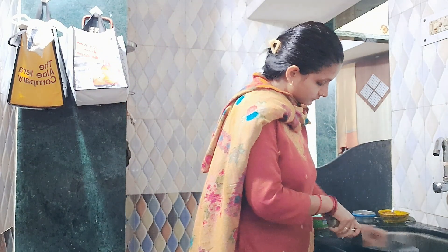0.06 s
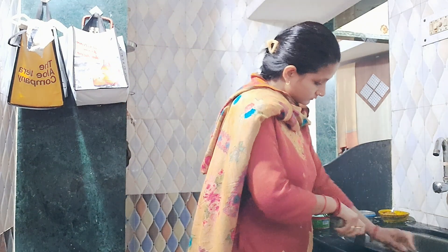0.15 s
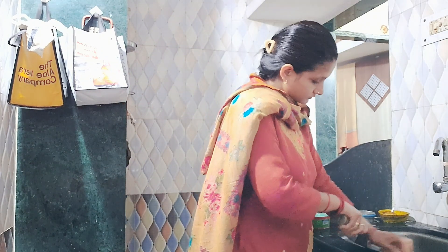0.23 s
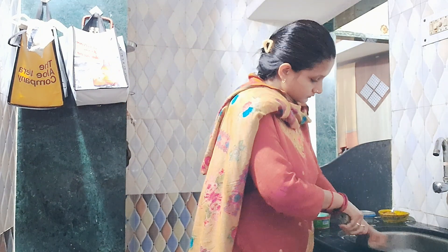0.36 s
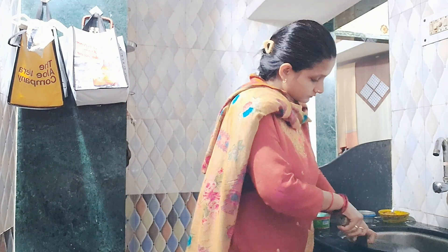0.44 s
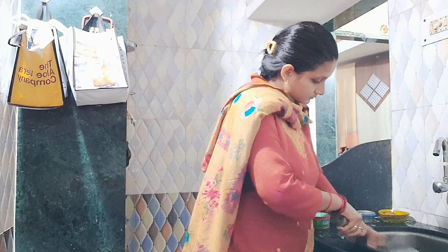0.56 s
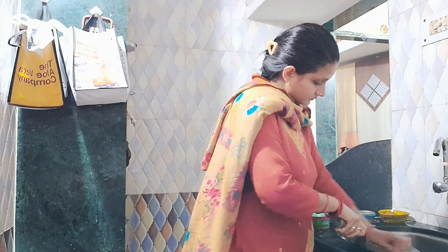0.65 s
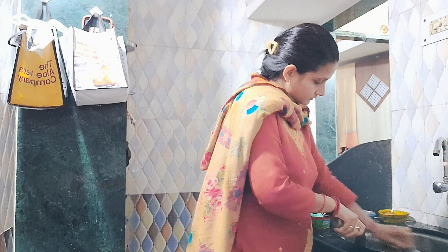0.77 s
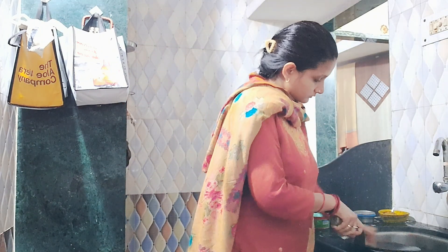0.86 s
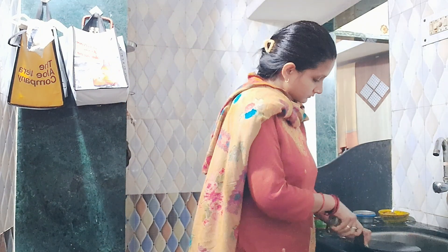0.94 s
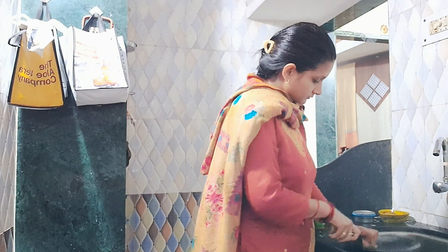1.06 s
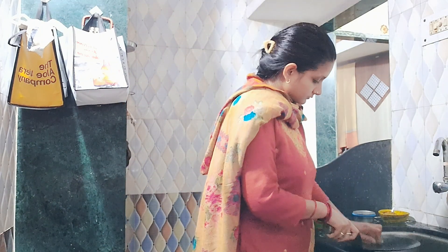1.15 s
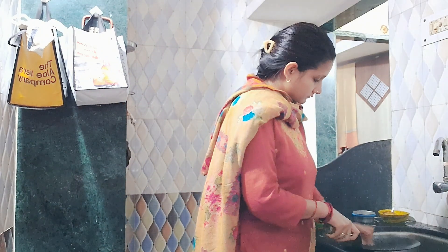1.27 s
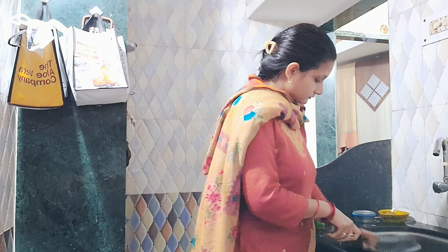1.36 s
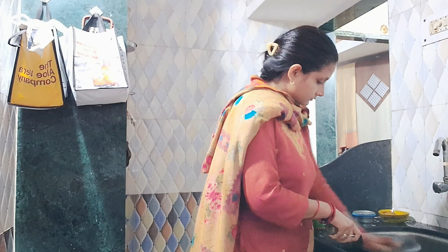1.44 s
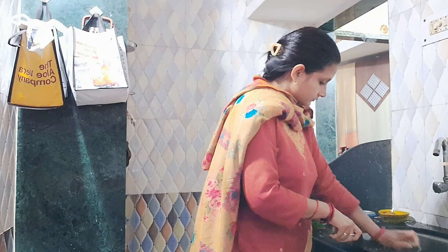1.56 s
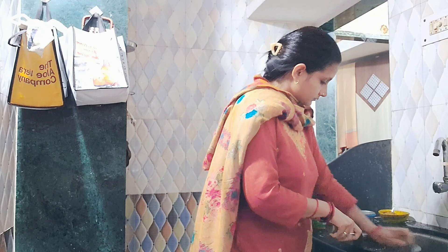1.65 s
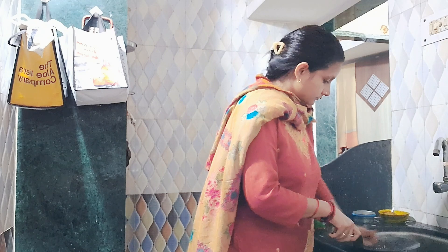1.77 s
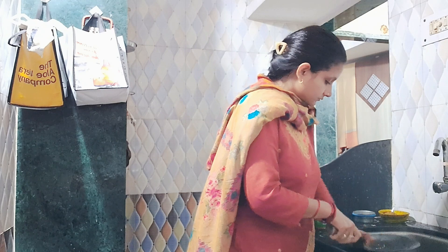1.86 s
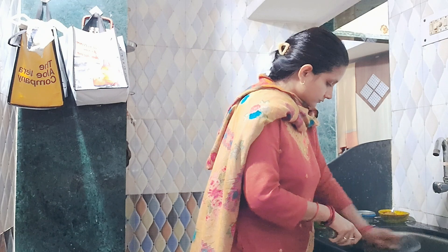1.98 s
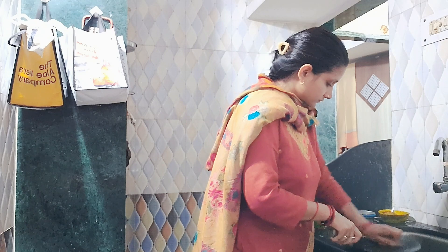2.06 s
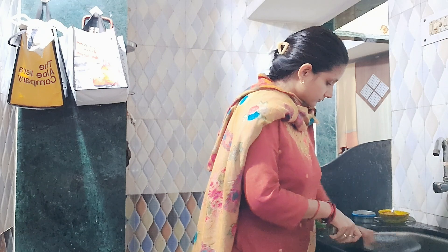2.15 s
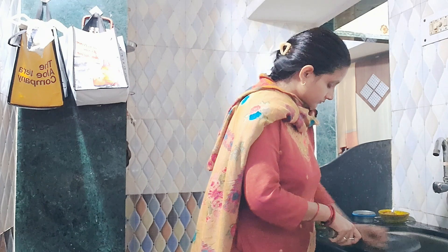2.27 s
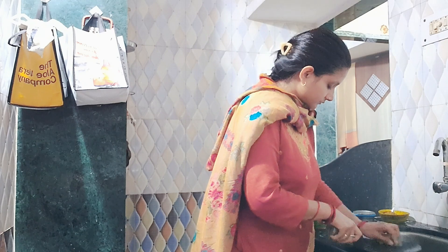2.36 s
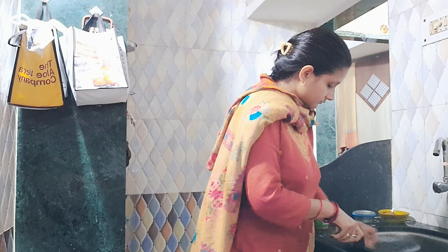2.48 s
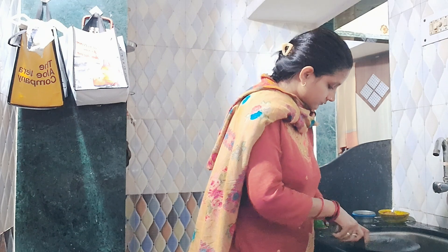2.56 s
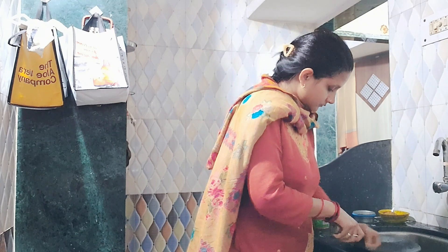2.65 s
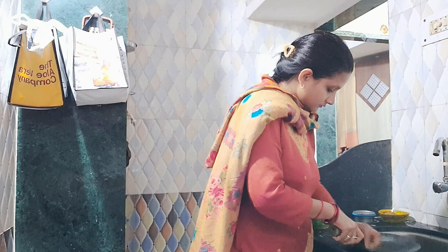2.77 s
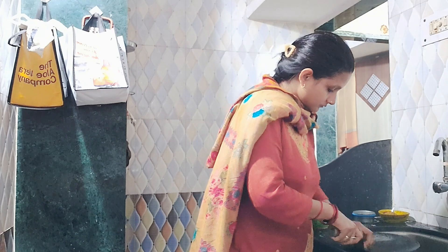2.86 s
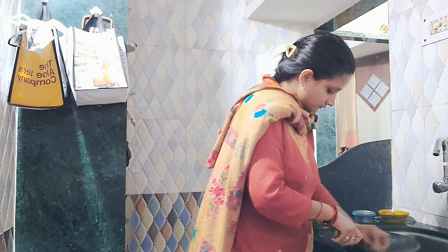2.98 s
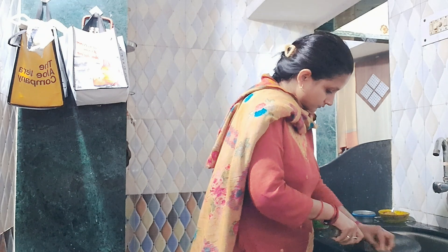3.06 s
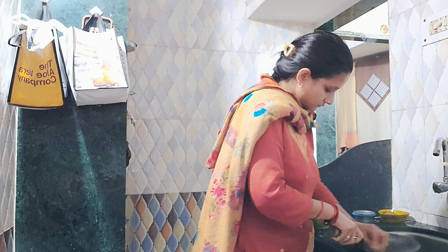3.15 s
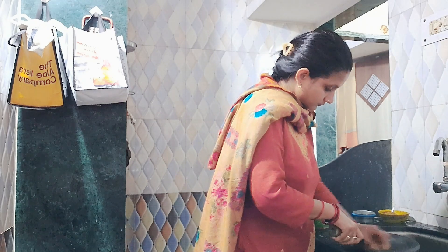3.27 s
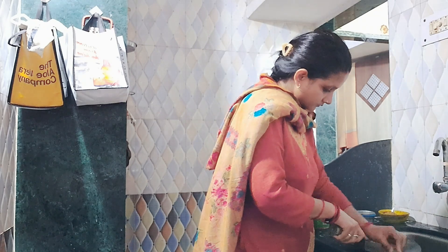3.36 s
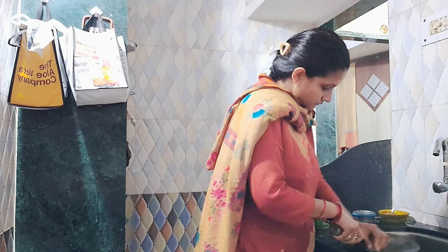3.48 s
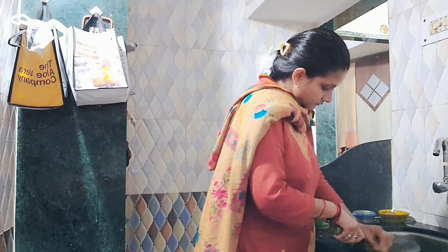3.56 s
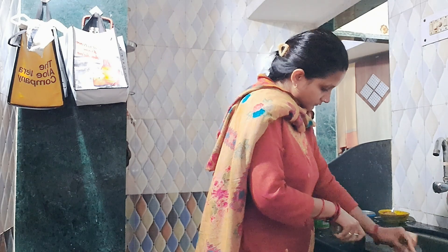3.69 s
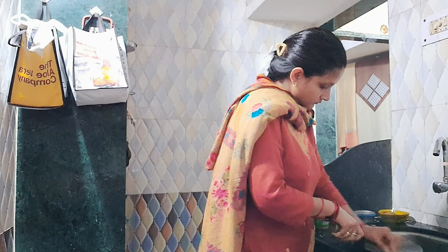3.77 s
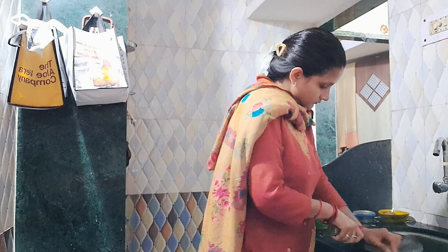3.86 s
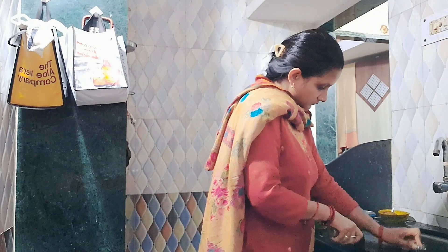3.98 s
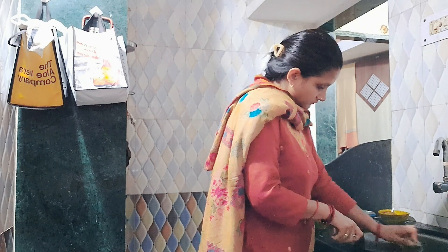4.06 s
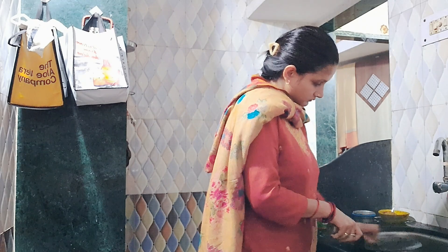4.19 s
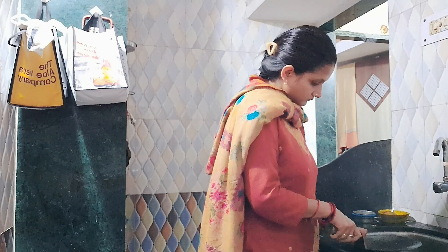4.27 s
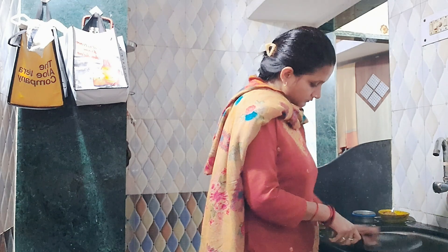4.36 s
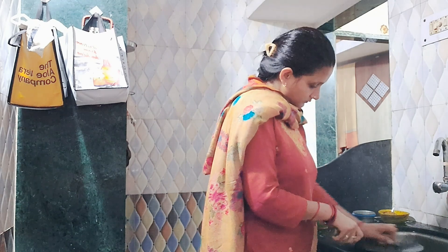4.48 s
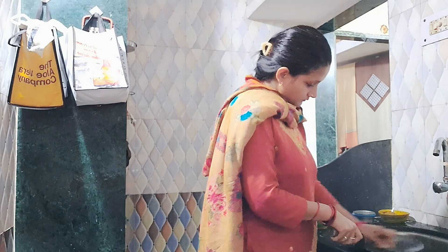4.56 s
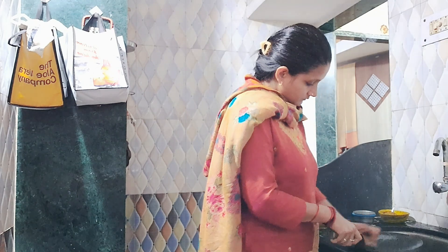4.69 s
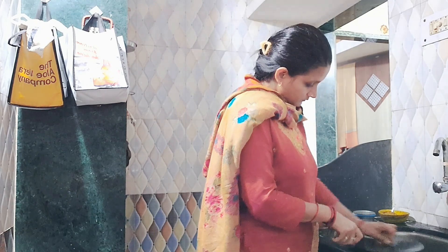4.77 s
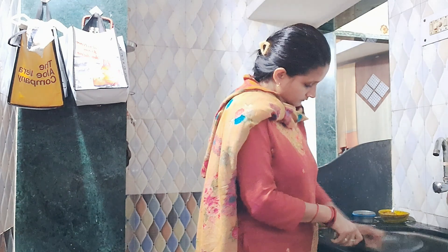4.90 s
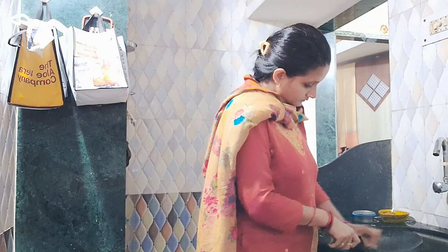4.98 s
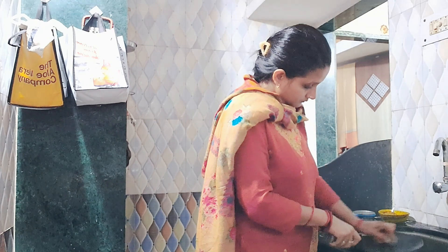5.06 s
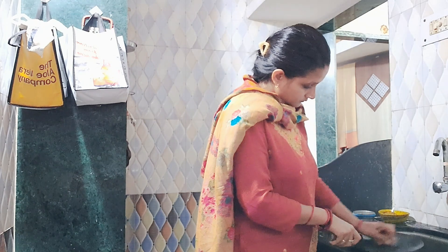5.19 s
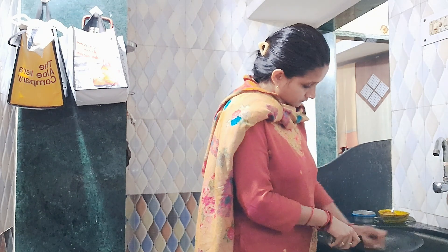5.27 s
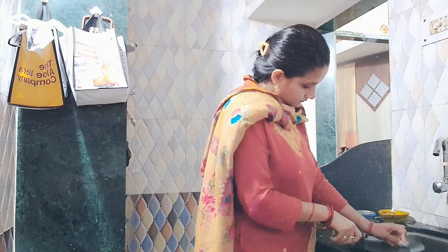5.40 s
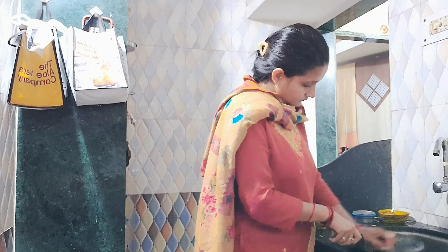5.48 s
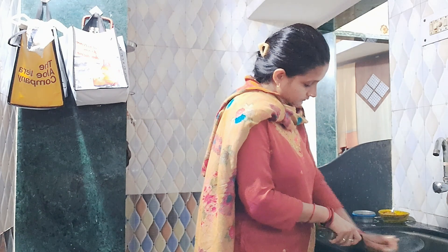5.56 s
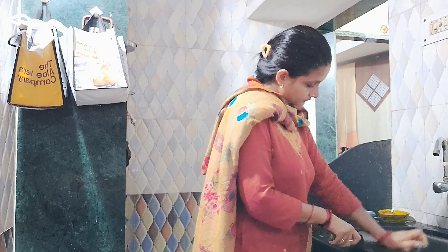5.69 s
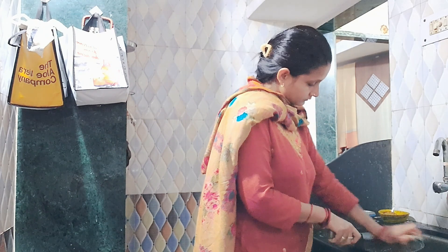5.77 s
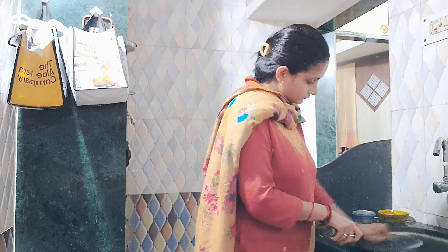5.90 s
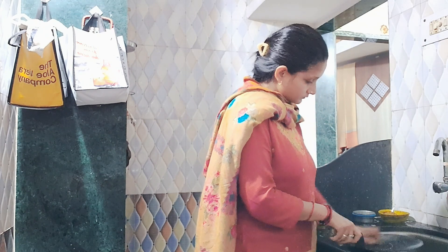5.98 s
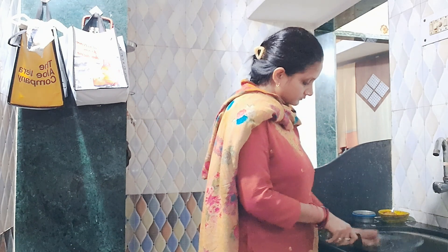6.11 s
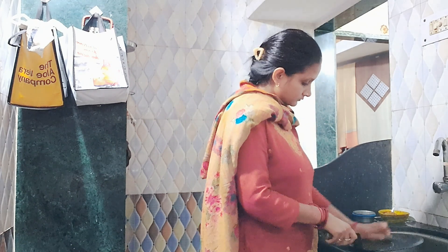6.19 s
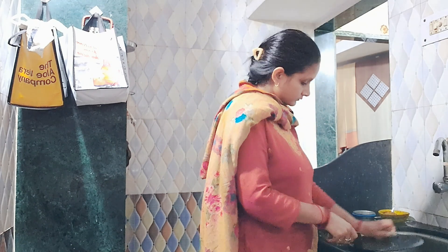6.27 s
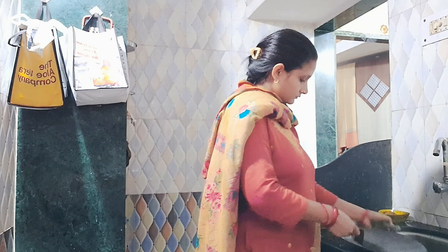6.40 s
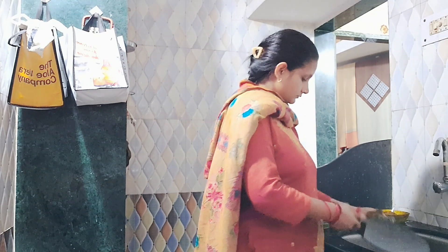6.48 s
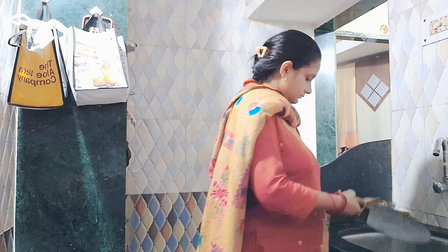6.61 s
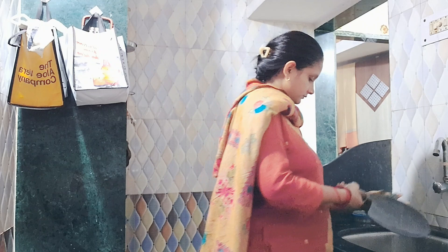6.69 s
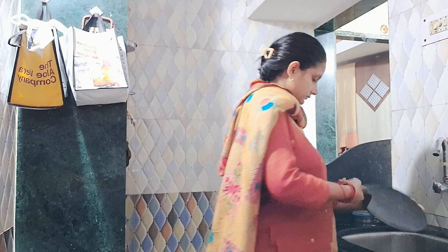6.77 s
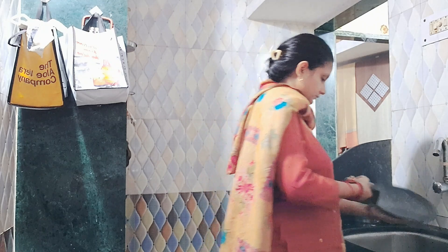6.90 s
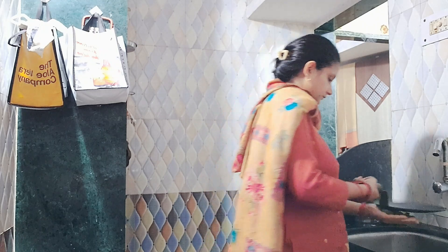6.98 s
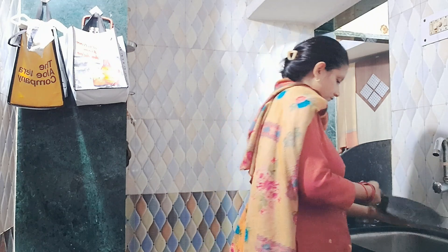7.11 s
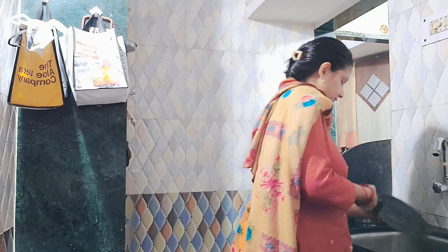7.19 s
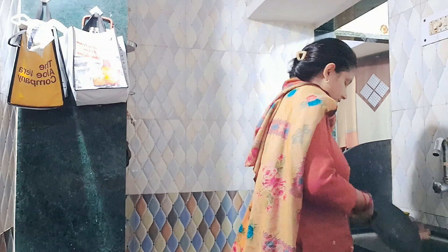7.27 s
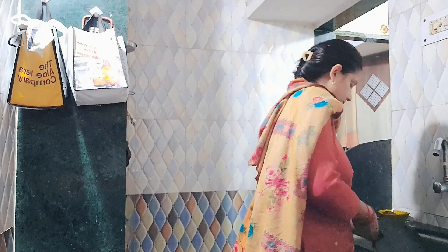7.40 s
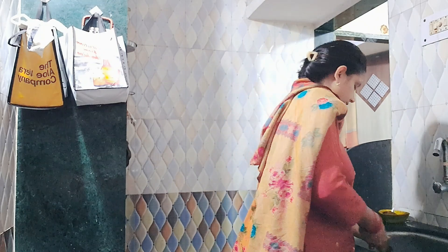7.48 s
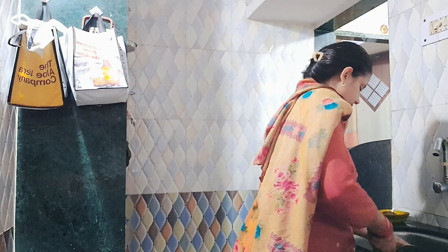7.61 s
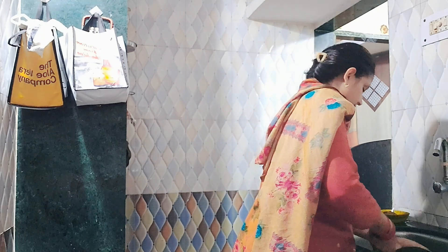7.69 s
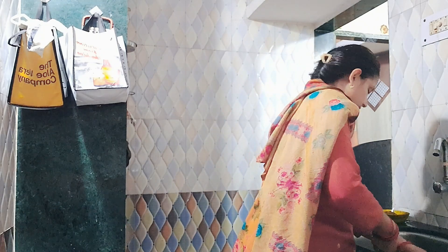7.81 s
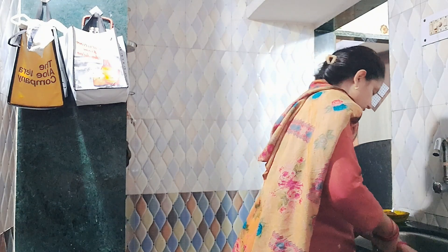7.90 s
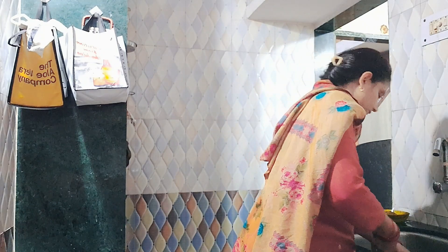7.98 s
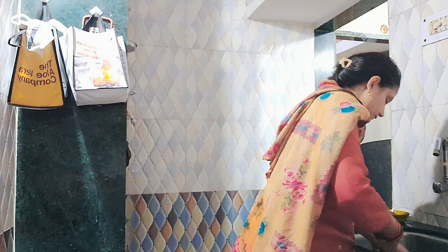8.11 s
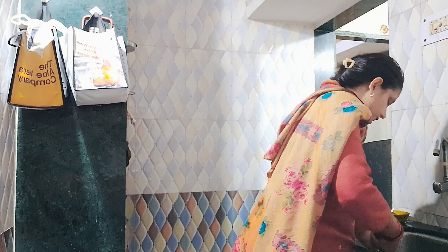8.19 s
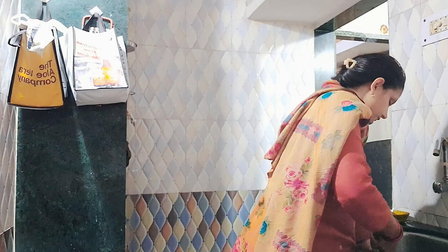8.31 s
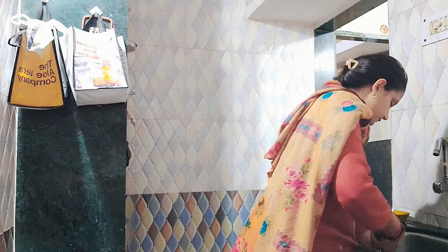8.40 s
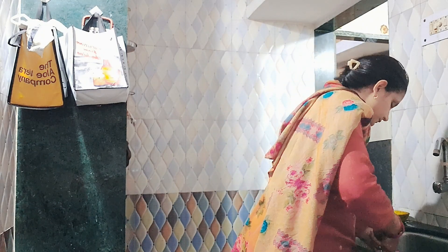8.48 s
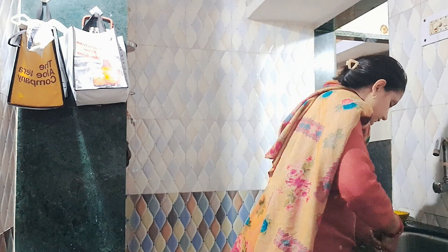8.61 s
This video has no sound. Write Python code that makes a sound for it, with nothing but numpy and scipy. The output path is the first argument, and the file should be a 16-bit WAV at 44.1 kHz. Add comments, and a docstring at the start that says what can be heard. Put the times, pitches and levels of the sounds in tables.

```python
"""The hiss of a wire pad comes first, stroke after stroke, scouring a flat metal pan over a steel sink.
The place is a small tiled kitchen; the sink is right of a two-port microphone and echoes come from all around.
Random slips of the wire, filtered, make the hiss and drag and ring the pan's modes; rocks and knocks
on the rim drive modes too. Bangles clink, a thin squeak and a deep rumble come late in quieter scouring,
and near the end the pan is set down with a bang that rings the basin. House noise lies underneath."""
import sys
import numpy as np
from scipy import signal
from scipy.fft import rfft, irfft, next_fast_len
from scipy.io import wavfile

SR = 44100
rng = np.random.default_rng(int(sys.argv[2]) if len(sys.argv) > 2 else 0)


def wrap_up_sound(samples):
    """Save the sound to the file named by the first command line argument, as 16-bit audio."""
    columns = np.atleast_2d(samples).T
    # keep every value between -1 and 1, then stretch to whole-number steps
    tamed = np.clip(columns, -1, 1)
    steps = np.round(tamed * 32767).astype(np.int16)
    wavfile.write(sys.argv[1], SR, steps)


N = 381465   # samples
STEP = 100   # samples between points of a slow control
BITE_S = 0.0023   # time constant of a contact's build-up


# Strokes of the pad: (start [s], length [s], relative hiss level [dB], ringing added to the hiss level [dB],
# dull drag added to the hiss level [dB], pitch of the pan modes favoured under the pad [Hz])
STROKES = [(-0.067, 0.22, -32, -5.5, -21, 3100), (0.122, 0.16, -40, 1.5, -7.5, 2180),
           (0.216, 0.26, -35, -3.5, -14.5, 2700), (0.433, 0.38, -35.5, -3, -17.5, 2180),
           (0.678, 0.38, -36.5, -3, -15.5, 2440), (0.994, 0.25, -37, -3, -14.5, 3680),
           (1.212, 0.21, -39.5, -3.5, -15, 2890), (1.36, 0.21, -32.5, -0.8, -14.5, 4230),
           (1.48, 0.26, -34.9, -0.5, -20, 2190), (1.687, 0.17, -37, -5, -17, 2540),
           (1.82, 0.13, -33, -5, -8, 2440), (1.886, 0.18, -35, -2.5, -13, 2470),
           (2.035, 0.19, -34.5, -4.5, -21.5, 2930), (2.202, 0.21, -34, -7.5, -16.5, 3480),
           (2.373, 0.22, -37, -3, -21.5, 2950), (2.559, 0.2, -36.5, -8.1, -17.5, 2180),
           (2.737, 0.16, -41.5, -2, -15, 2200), (2.871, 0.22, -38, -3.5, -12.5, 2200),
           (3.048, 0.19, -40, -1.5, -16, 3720), (3.207, 0.21, -37, -5.5, -18, 4870),
           (3.401, 0.15, -37.5, -4.3, -16, 3680), (3.516, 0.23, -35, -5, -16, 4940),
           (3.713, 0.14, -36.5, -6.5, -16.5, 4900), (3.796, 0.32, -34.5, -2, -13, 2180),
           (4.008, 0.35, -35, -3.5, -19.5, 3630), (4.295, 0.27, -33, -2.5, -12.5, 3770),
           (4.525, 0.17, -33, -5, -18.5, 4900), (4.646, 0.19, -32.0, -6, -20, 4900),
           (4.812, 0.18, -32.0, -7.4, -24.5, 2440), (4.944, 0.21, -35.5, -2, -16.5, 5000),
           (5.13, 0.16, -35, -4, -25.5, 4900), (5.265, 0.17, -31.5, -8, -16, 4200),
           (5.415, 0.17, -37, 3, -24, 4930), (5.485, 0.14, -25, -0.5, -15, 3030),
           (5.608, 0.18, -34, 0, -24, 3540), (5.736, 0.2, -33.5, 1.5, -15, 4770),
           (5.887, 0.2, -38, -7, -16.5, 4900), (6.037, 0.22, -37.0, -5.3, -17, 2500),
           (6.192, 0.18, -40.0, 3.5, -10, 2380), (6.373, 0.22, -58.5, -14, -15, 2490),
           (6.56, 0.13, -61, -2, -13.5, 3600), (6.65, 0.27, -37.5, -3, -21.5, 2340),
           (6.816, 0.24, -40.5, 1.5, -12.5, 2440), (7.005, 0.35, -41, -2.7, -11.5, 2440),
           (7.264, 0.358, -40, -1.5, -13, 2340), (7.574, 0.34, -53, -0.1, -9.5, 2440),
           (7.816, 0.19, -41.5, -0.9, -5.5, 4330), (7.911, 0.18, -34.5, -5, 0.0, 2140),
           (8.089, 0.19, -44.0, -0.3, -6, 2200), (8.195, 0.17, -43.5, -0.5, -5, 2200),
           (8.34, 0.14, -44, 2.5, -11, 3730), (8.432, 0.23, -42, -1, -12, 2180)]
STROKE_SHAPE = 1.56   # loudness follows the pad's speed, half a sine, to this power


def strokes():
    """Gains of hiss, ringing and drag summed over the strokes, and the favoured pitch weighted by ringing."""
    t = np.arange(N // STEP + 1) * STEP / SR
    sums = 1e-9   # keeps the ratio below defined between strokes
    for start, length, hiss_db, ring_db, drag_db, hz in STROKES:
        progress = np.clip((t - start) / length, 0, 1)
        loudness = np.sin(np.pi * progress).clip(0) ** STROKE_SHAPE
        hiss, ring, drag = from_db([hiss_db, hiss_db + ring_db, hiss_db + drag_db])
        sums = sums + loudness * np.array([[hiss], [ring], [drag], [ring * hz]])
    hiss_gain, ring_gain, drag_gain = map(every_sample, sums[:3])
    favoured_hz = sums[3] / sums[1]
    return hiss_gain, ring_gain, drag_gain, favoured_hz


# Hard catches that jar the pan: (time [s], relative level [dB], contact length [s], brightness [dB per octave])
CATCHES = [(0.056, -29, 0.023, -2.5), (0.148, -21, 0.012, -9.5), (0.2863, -21.5, 0.0096, -2),
           (0.65, -31, 0.0094, -0.5), (1.3972, -15.5, 0.0094, 1), (1.628, -25.5, 0.0086, -4),
           (1.863, -11.5, 0.0085, -2), (1.932, -24, 0.014, 3.5), (2.285, -30, 0.016, 4.5),
           (3.855, -26, 0.016, -2.5), (4.117, -25, 0.008, -10), (4.4295, -20.5, 0.013, -2),
           (5.315, -16.5, 0.01, -1), (5.509, -15.5, 0.014, -2), (5.547, -29, 0.004, -18),
           (5.649, -26.5, 0.011, 6.5), (5.67, -28, 0.0057, 4), (5.819, -33, 0.0094, -7),
           (7.865, -29.5, 0.024, 2), (7.95, -23.5, 0.018, -6), (8.486, -30.5, 0.011, 5)]
# Clear modes of the pan: (frequency [Hz], width [Hz], relative level [dB])
PAN_MODES = [(1160, 40, -17), (1750, 60, -14), (2120, 30, -6), (2320, 30, -4), (2520, 26, -2),
             (2650, 30, -6), (2830, 22, -3), (2960, 22, -3), (3530, 30, -5), (3625, 28, 0), (3720, 18, 2),
             (3820, 22, 1), (4376, 24, -4), (4432, 20, -4), (4865, 30, -1), (5500, 60, -7), (6100, 40, -8),
             (6350, 20, -4), (6580, 30, -6), (6730, 22, -2), (7160, 60, -8), (7500, 40, -5), (8020, 90, -8),
             (9394, 18, -8), (10900, 60, -10), (11600, 140, -11), (12200, 70, -12), (12700, 70, -11)]
# Spectrum of the pan's crowd of weak modes: (frequency [Hz], relative level per Hz [dB])
PAN_BODY = [(900, -17), (1700, -18.5), (2300, -1), (3200, 8), (3800, 19), (5000, 2), (6500, -15.5),
            (10000, -87)]
# Spectrum of the hiss as heard, dropping sharply just above 8 kHz: (frequency [Hz], relative level per Hz [dB])
HISS_AS_HEARD = [(1060, -64), (1800, -10.5), (2460, -20), (3200, -12), (3800, -16), (5500, -14), (7950, -1),
                 (8350, -9), (10000, -17.5), (12400, -15.5), (15000, -19), (16000, -12)]
# Spectrum of the dull drag: (frequency [Hz], relative level per Hz [dB])
PAD_DRAG = [(250, -20), (500, -20), (900, 1), (1300, 0), (1900, -2.5), (2400, 5.5), (4000, -145)]


def scouring(hiss_gain, ring_gain, drag_gain, favoured_hz):
    """Wire slips hiss directly, drag dully and ring the pan; catches add a broad rasp."""
    slips = grains(per_s=9000, spread_db=2.0)
    grit = grains(per_s=2500, spread_db=3.0)   # catches slip in fewer, larger jerks
    hiss = from_db(-3.5) * hiss_gain * coloured(slips, HISS_AS_HEARD)
    rasp_force = from_db(-5) * contacts(CATCHES, 8000, scatter_db=1, pivot_hz=3920)
    rasp = rasp_force * coloured(grit, HISS_AS_HEARD)
    drag = from_db(-1.5) * drag_gain * coloured(slips, PAD_DRAG)
    ring = struck(PAN_MODES, from_db(-7.0) * ring_gain, CATCHES, slips, wander_db=3.5, scatter_db=2.5,
                  pivot_hz=3880, blow_db=-5.5, favoured_hz=favoured_hz, favour_db=5)
    # between its clear modes the pan has a dense crowd of weak ones
    jolts = from_db(-21) * contacts(CATCHES, 3400, scatter_db=0, pivot_hz=4000)
    crowd = (from_db(-8) * ring_gain + jolts) * coloured(grit, PAN_BODY)
    return hiss + rasp + drag + ring + crowd


# The pan rocks and drags on the rim of the sink: (start [s], relative peak level [dB], time to peak [s])
ROCKING = [(0.04, -46, 0.042), (0.13, -33, 0.029), (0.309, -42.5, 0.065), (0.63, -46, 0.05),
           (1.35, -38, 0.069), (1.84, -44, .05), (2.28, -57, 0.057), (2.6, -48.5, 0.054), (2.82, -47, 0.02),
           (2.92, -45, 0.072), (3.11, -50, 0.068), (3.57, -53.5, .06), (3.849, -43.5, 0.017),
           (3.97, -38.5, 0.036), (4.1, -41, 0.018), (4.372, -43, 0.045), (4.75, -50, 0.021),
           (5.3, -53, 0.036), (5.49, -40.5, 0.024), (5.65, -50.5, .07), (5.81, -44.5, 0.021),
           (6.1, -47.5, 0.077), (6.231, -28, 0.027), (6.95, -47.5, 0.11), (7.629, -59, 0.027),
           (7.83, -55, .04)]


def rocking():
    """Each rock swells to its peak and dies away more slowly."""
    t = np.arange(N // STEP + 1) * STEP / SR
    out = 0
    for start, db, rise in ROCKING:
        u = np.maximum(t - start, 0) / rise
        out = out + from_db(db) * u * np.exp(1 - u)
    return every_sample(out)


# Pan against the rim: (time [s], relative level [dB], contact length [s], brightness [dB per octave])
BUMPS = [(0.052, -47, 0.029, 3), (0.148, -27, 0.01, 3), (0.356, -21, 0.011, -10.5),
         (0.548, -31.5, 0.022, -2), (0.71, -46, 0.013, -5), (1.39, -53, 0.029, -18),
         (1.857, -47, 0.0097, 38), (2.299, -54, 0.029, -9.5), (2.645, -34.5, 0.02, -4),
         (3.117, -32, 0.021, -1.5), (3.961, -29.5, 0.0091, 11), (4.418, -38, 0.011, 26),
         (4.919, -41.5, 0.024, 12), (5.325, -42, 0.013, 11), (5.522, -42.5, 0.021, 32),
         (6.261, -37.5, 0.058, 9)]
# Modes of rim and counter: (frequency [Hz], width [Hz], relative level [dB])
RIM_MODES = [(176, 16.4, -18), (269.4, 19.5, -0.5), (271, 95, -7), (376.3, 23, -1), (430, 50, -4.5),
             (525.4, 31, 5), (685, 46, -26.5), (702, 29, -3.5), (815, 130, -15.5)]
# Spectrum of the rough thud between the modes: (frequency [Hz], relative level per Hz [dB])
RIM_BODY = [(80, -29), (200, -19.5), (400, -7.5), (900, 3), (1300, -17), (3000, -49)]
SHAKE_DB = -24.5   # every stroke shakes the pan on the rim: drive added, relative to the hiss gain


def rim(hiss_gain):
    """The pan rocks and knocks on the edge of the sink, in clear modes and a rough thud between them."""
    level = rocking() + from_db(SHAKE_DB) * hiss_gain
    slips = grains(per_s=1900, spread_db=3.5)
    knocks = contacts(BUMPS, 500, scatter_db=0, pivot_hz=400)
    thud_gain = from_db(-19) * level + from_db(-34) * knocks
    thud = thud_gain * coloured(slips, RIM_BODY)
    modes = struck(RIM_MODES, from_db(-12.5) * level, BUMPS, slips, wander_db=5.5, scatter_db=1.0,
                   pivot_hz=450, blow_db=-6.5)
    return thud + modes


# Pan set down in the basin: (time [s], relative level [dB], contact length [s], brightness [dB per octave])
BANGS = [(7.824, -53.5, 0.023, 6.5), (7.951, -28, 0.086, -3), (7.995, -9.5, 0.024, 2),
         (8.024, -19, 0.0049, 0.1), (8.098, -19.5, 0.0079, -0.5), (8.259, -25, 0.012, 2.5),
         (8.308, -41, 0.023, -5), (8.479, -47.5, 0.034, 2), (8.587, -39.5, 0.013, -3.5)]
# Modes of the basin: (frequency [Hz], width [Hz], relative level [dB])
BASIN_MODES = [(129, 7, 3), (165, 12, -10), (230, 20, -12), (312, 14, -6), (365, 14, -6), (417, 14, -3),
               (480, 20, -11), (555, 20, -11), (667, 16, -11), (695, 10, -5), (785, 25, -12),
               (910, 30, -15), (1114, 35, -16), (1206, 35, -15), (1464, 40, -15), (1930, 45, -16),
               (2035, 45, -16), (2150, 45, -16), (2240, 45, -16)]
# Spectrum of the basin's crowd of weaker modes: (frequency [Hz], relative level per Hz [dB])
BASIN_BODY = [(50, -13), (120, -14), (400, 4), (800, -5.5), (1500, -10.5), (2400, -24.5), (4000, -11.5),
              (8000, -42), (16000, -60)]


def basin():
    """The steel bowl booms in its modes and, between them, in a dense crowd of weaker ones."""
    slips = grains(per_s=6000, spread_db=2.0)
    modes = struck(BASIN_MODES, 0, BANGS, slips, wander_db=-1.5, scatter_db=1.5, pivot_hz=544, blow_db=-5)
    blows = contacts(BANGS, 1000, scatter_db=0, pivot_hz=500)
    crowd = from_db(-7.0) * blows * coloured(slips, BASIN_BODY)
    return modes + crowd


# Bangles touching: (time [s], relative level [dB], central pitch [Hz])
CLINKS = [(1.4004, -41, 11650), (1.8645, -37, 9430), (3.0697, -40, 10350), (5.643, -44, 11700),
          (8.1439, -53.5, 11600)]


def bangles():
    """Each touch rings a small cluster of high, short modes."""
    out = np.zeros(N)
    t = np.arange(SR // 10) / SR
    for s, db, hz in CLINKS:
        mode_hz = hz * (1 + .05 * rng.standard_normal(6))
        cluster = np.sin(2 * np.pi * mode_hz[:, None] * t).sum(axis=0)
        ring = cluster * np.exp(-t / .007)
        i = round(s * SR)
        out[i:i + len(t)] += from_db(db + 1.0) * ring
    return out


# A thin squeak: (time [s], pitch [Hz], relative level [dB])
SQUEAK = [(6.42, 3660, -61), (6.428, 3600, -74), (6.47, 3800, -94), (6.524, 3540, -89), (6.554, 3590, -68),
          (6.67, 3586, -74), (6.68, 3650, -59)]


def squeak():
    """A slightly wavering tone with its octave."""
    hz, db = in_time(SQUEAK)
    waver = 1 + 0.0013 * every_sample(drift(40))
    phase = 2 * np.pi * np.cumsum(hz * waver) / SR
    tone = np.sin(phase) + from_db(-3) * np.sin(2 * phase)
    on = np.arange(N) < SQUEAK[-1][0] * SR
    return on * from_db(db + 14.5) * tone


# A deep rumble through the counter: (time [s], level [dB])
RUMBLE = [(6.9, -85), (6.92, -91), (6.966, -69), (7.118, -62), (7.188, -62), (7.26, -63), (7.55, -88),
          (7.668, -95), (7.8, -95)]


def rumble():
    """Deep band-passed noise, its level swelling once, holding, then fading."""
    db, = in_time(RUMBLE)
    band = signal.butter(2, [55, 130], "band", fs=SR, output="sos")
    deep = signal.sosfilt(band, rng.standard_normal(N))
    return from_db(db) * rms_one(deep)


# Decay of the tiled kitchen: (frequency [Hz], time to fall 60 dB [s])
KITCHEN_T60 = [(100, .45), (500, .36), (2000, .33), (6000, .25), (14000, .18)]


def kitchen(x):
    """Diffuse echoes: octave bands of noise, each dying at its own rate, different at the two ports."""
    t = np.arange(SR // 2) / SR
    white = rng.standard_normal((2, len(t)))
    onset = 1 - np.exp(-t / .006)
    tail = 0
    for low in 60 * 2 ** np.arange(8):
        octave = signal.butter(2, [low, 2 * low], "band", fs=SR, output="sos")
        decay = from_db(-60 * t / at_hz(KITCHEN_T60, 1.41 * low))
        band = signal.sosfilt(octave, white) * decay * onset
        # energy in proportion to bandwidth
        tail = tail + band * np.sqrt(low / np.sum(band ** 2, axis=1, keepdims=True))
    tail = tail / np.sqrt(np.sum(tail ** 2, axis=1, keepdims=True))
    return signal.fftconvolve(x[None], two_ports(*tail), axes=1)[:, :N]


# Spectrum of the house noise: (frequency [Hz], relative level per Hz [dB])
HOUSE = [(30, -5), (65, -20), (100, 5), (140, -21), (400, -26), (900, -10), (1500, -39), (3500, -0.5),
         (9000, -11), (16000, -48)]
HOUSE_DB = -63   # gain of the unit-rms noise ahead of the microphone


def house():
    """Steady background of the house: independent shaped noise for each port."""
    noise = coloured(rng.standard_normal((2, N)), HOUSE)
    return from_db(HOUSE_DB) * two_ports(*noise)


LEFT_LAG = 8   # samples: the left port is some 6 cm farther from the sink
ALIKE_BELOW_HZ, LEFT_DB = 330, -4.6   # crossover; shading of the left port above it
BASS_UNLIKE = .15   # share of the long waves that still differs between the ports


def two_ports(right, left):
    """Long waves reach both microphone ports nearly alike; short ones differ and are shaded on the left."""
    def split(kind, pair):
        """Two Butterworth filters in a row, on each port."""
        once = signal.butter(2, ALIKE_BELOW_HZ, kind, fs=SR, output="sos")
        return signal.sosfilt(np.tile(once, (2, 1)), pair)

    long_waves = split("low", [right + BASS_UNLIKE * (left - right), right])
    short_waves = split("high", [from_db(LEFT_DB) * left, right])
    return long_waves + short_waves


def struck(modes, steady, events, slips, wander_db, scatter_db, pivot_hz, blow_db, favoured_hz=1, favour_db=0):
    """A body driven by rubbing and by blows; the moving contact point favours now one mode, now another."""
    total = np.sqrt(sum(from_db(2 * db) * np.pi * width / SR for hz, width, db in modes))
    out = np.zeros(N)
    for k, (hz, width, db) in enumerate(modes):
        favour = favour_db * np.exp(-(np.log2(hz / favoured_hz) / 0.39) ** 2)   # width in octaves
        reach = every_sample(from_db(favour + wander_db * drift(6.2)))
        force = steady + from_db(blow_db) * contacts(events, hz, scatter_db, pivot_hz)
        sign = (-1) ** k   # neighbouring modes move in opposite phase
        out += sign * from_db(db) / total * resonance(slips * force * reach, hz, width)
    return out


def contacts(events, hz, scatter_db, pivot_hz):
    """Force felt by one mode: each contact bites quickly, dies away, and reaches the mode more or less."""
    out = np.zeros(N)
    for s, db, length, tilt_db in events:
        length = max(length, .002)
        t = np.arange(int(6 * length * SR)) / SR
        force = np.exp(-t / length) * (1 - np.exp(-t / BITE_S))
        level_db = db + tilt_db * np.log2(hz / pivot_hz) + scatter_db * rng.normal()
        i = round(s * SR)
        out[i:i + len(force)] += from_db(level_db) * force[:N - i]
    return out


def resonance(x, hz, width_hz):
    """One mode; white noise of rms 1 through it comes out with rms near sqrt(pi width / SR)."""
    r = np.exp(-np.pi * width_hz / SR)
    feed = np.array([1, 0, -1]) * (1 - r * r) / 2
    return signal.lfilter(feed, [1, -2 * r * np.cos(2 * np.pi * hz / SR), r * r], x)


def grains(per_s, spread_db):
    """Random slips of uneven size and either sign; rms 1."""
    sizes = from_db(spread_db * np.minimum(rng.exponential(1, N), 4))
    signs = rng.choice([-1, 1], N)
    return rms_one(sizes * signs * (rng.random(N) < per_s / SR))


def coloured(x, spectrum):
    """Give a dense noise the spectrum; rms 1."""
    size = next_fast_len(N)
    hz = np.maximum(np.arange(size // 2 + 1) * SR / size, 1)
    shaped = rfft(x, size) * from_db(at_hz(spectrum, hz))
    return rms_one(irfft(shaped, size)[..., :N])


def drift(rate_hz):
    """Slow random wander of rms 1, one point a step, from twice-smoothed noise."""
    r = np.exp(-2 * np.pi * STEP * rate_hz / SR)
    noise = rng.standard_normal(N // STEP + 1001)
    settled = signal.lfilter([1], [1, -2 * r, r * r], noise)[1000:]
    return rms_one(settled)


def every_sample(slow):
    """Join the points of a slow control."""
    return np.interp(np.arange(N) / STEP, np.arange(len(slow)), slow)


def in_time(rows):
    """Columns of a curve at every sample: -200 before its first point, the last value held after it."""
    s, *columns = np.transpose(rows)
    return [np.interp(np.arange(N) / SR, s, c, left=-200, right=c[-1]) for c in columns]


def at_hz(points, hz):
    """Read a curve on a log-frequency axis."""
    point_hz, value = np.transpose(points)
    return np.interp(np.log(hz), np.log(point_hz), value)


def from_db(db):
    """Decibels to gain."""
    return 10 ** (np.asarray(db) / 20)


def rms_one(x):
    """Scale to unit rms."""
    return x / np.sqrt(np.mean(x ** 2) + 1e-20)


KITCHEN_DB = 4   # gain of the echoes


def scene():
    """The sink stands to the right: its direct sound reaches the left port later and shaded."""
    pad = strokes()
    sink = scouring(*pad) + rim(pad[0]) + basin() + bangles() + squeak() + rumble()
    late = np.concatenate([np.zeros(LEFT_LAG), sink[:-LEFT_LAG]])
    direct = two_ports(sink, late)
    # hands and pan keep moving: the sound is shared, changingly, among three spots with echoes of their own
    share = from_db([6.0 * drift(6.0) for spot in range(3)])
    share = share / np.sqrt(np.sum(share ** 2, axis=0))
    echoes = sum(kitchen(sink * every_sample(part)) for part in share)
    return direct + from_db(KITCHEN_DB) * echoes + house()


BASS_CUT_HZ, CUTOFF_HZ = 65, 16600   # high-pass corner; from the second on the top is 80 dB down


def record(dry):
    """The microphone loses the deepest bass; the top is cut steeply."""
    thin = signal.sosfilt(signal.butter(2, BASS_CUT_HZ, "high", fs=SR, output="sos"), dry)
    return signal.sosfilt(signal.cheby2(16, 80, CUTOFF_HZ, fs=SR, output="sos"), thin)


dry = scene()
out = record(dry)
wrap_up_sound(out)
```